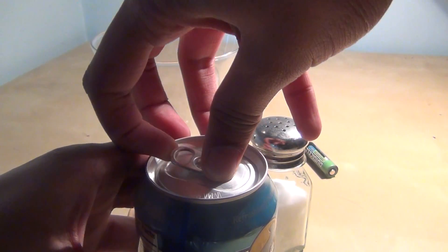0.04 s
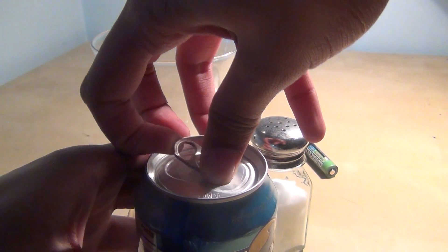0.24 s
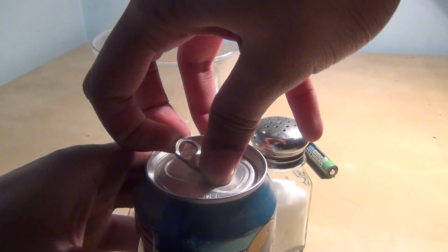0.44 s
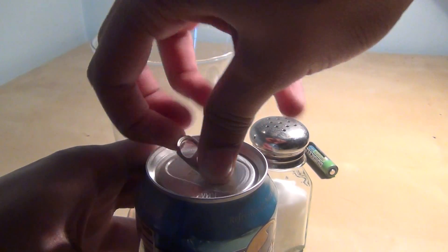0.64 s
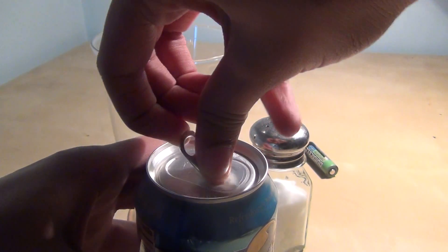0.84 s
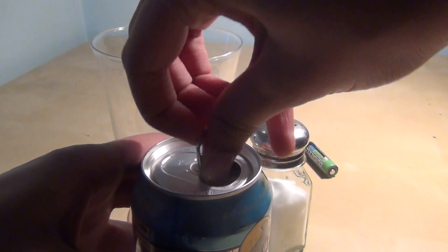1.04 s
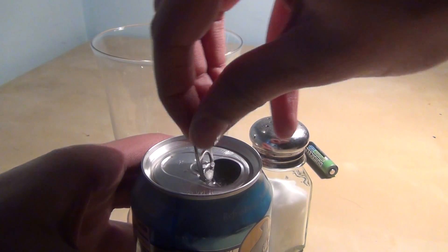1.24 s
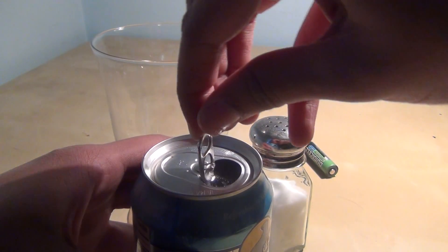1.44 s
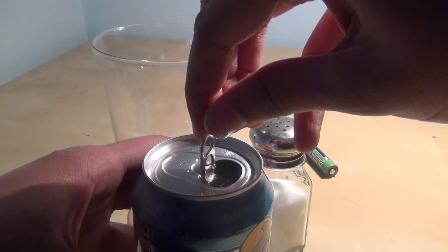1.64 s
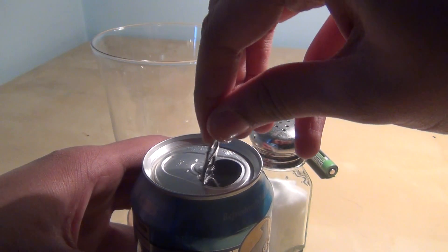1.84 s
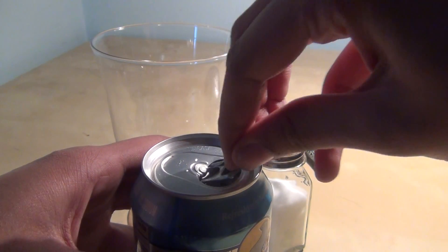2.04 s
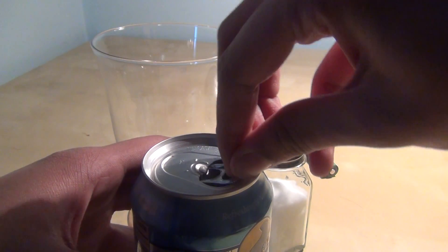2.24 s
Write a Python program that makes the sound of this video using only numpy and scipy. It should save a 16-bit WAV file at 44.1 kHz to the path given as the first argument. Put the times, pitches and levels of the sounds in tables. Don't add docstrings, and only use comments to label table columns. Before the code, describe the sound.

A drink can is cracked open close by with a sharp hiss, a pop, then faint fizz.

```python
import sys
import numpy as np
from scipy import signal
from scipy.fft import rfft, irfft, next_fast_len
from scipy.io import wavfile
from scipy.ndimage import uniform_filter1d, map_coordinates

SR = 44100
rng = np.random.default_rng(int(sys.argv[2]) if len(sys.argv) > 2 else 0)


def to_linear_factor(level_db):
    exponent = np.asarray(level_db, float) / 20
    return 10 ** exponent


def pcm_store(signal):
    levels = np.round(np.clip(np.atleast_2d(signal), -1, 1) * 32767)
    wavfile.write(sys.argv[1], SR, levels.astype(np.int16).T)


N = 101429


def unit(x):
    return x / np.sqrt(np.mean(x ** 2) + 1e-20)


def noise():
    return rng.standard_normal(N)


def along(points, hz):
    f, v = np.transpose(points)
    return np.interp(np.log(hz + 1), np.log(f + 1), v)


def level(rows, outside=-120):
    s, db = np.transpose(rows)
    return to_linear_factor(np.interp(np.arange(N) / SR, s, db, left=outside))


def wobble(rate):
    knots = rng.standard_normal(int(N * rate / SR) + 4)
    return map_coordinates(knots, [np.arange(N) * rate / SR])


def filtered(x, response):
    m = next_fast_len(len(x.T) + 8192)
    return irfft(rfft(x, m) * response(np.fft.rfftfreq(m, 1 / SR)), m)[..., :len(x.T)]


def peak(f, hz, width):
    return 1j * f * width / (hz * hz - f * f + 1j * f * width)


def hollow(x, colour, cavity):
    def response(f):
        resonances = sum((to_linear_factor(db) - 1) * peak(f, hz, w) for hz, w, db in cavity)
        return to_linear_factor(along(colour, f)) * (1 + resonances)
    return unit(filtered(x, response))


def patchy(x):
    z = signal.stft(x, nperseg=256)[2]
    field = uniform_filter1d(rng.standard_normal(z.shape), size=4, axis=0)
    field = uniform_filter1d(field, size=6, axis=1)
    patch_db = 3 * unit(field)
    return unit(signal.istft(z * to_linear_factor(patch_db), nperseg=256)[1][:N])


# (time [s], peak level [dB], lid ring [Hz], bright crack [dB], T60 [s])
SNAPS = [(0.2448, -15.5, 4250, 1.5, 0.0058), (0.2854, -12, 5000, -11, 0.0069),
         (0.3084, -12.5, 4090, -20, 0.0095), (0.3084, -18, 2120, -28, 0.0065),
         (.518, -51.5, 3700, -11, 0.01), (0.703, -56, 3650, -2, 0.016), (0.786, -53, 3500, -12, 0.0066),
         (0.803, -51, 3900, -10, 0.011), (0.832, -41.5, 3800, -6, 0.016),
         (0.839, -41.5, 3700, -11.5, 0.0094), (0.8498, -33, 3700, -24, 0.011),
         (0.8538, -23, 5000, -9.5, 0.0076), (0.8569, -24, 5450, 7.5, 0.014),
         (0.8572, -25, 3530, -30, 0.019), (0.8545, -33.5, 1980, -30, 0.0066),
         (0.9736, -15.5, 3400, -0.5, 0.014), (0.9755, -24.5, 7500, -6, 0.03),
         (0.9823, -31, 3300, -24, 0.028), (0.9904, -14.5, 9000, 4, 0.0059),
         (1.0062, -13.5, 2800, -27, .012)]
# (time [s], peak level [dB], lid ring [Hz], bright crack [dB], T60 [s])
TICKS = [
    (1.113, -27, 3300, -26, .01),
    (1.759, -40.5, 7700, -15, 0.0062),
    (1.951, -42, 1970, -30, 0.0069),
    (2.014, -42, 7340, -10, 0.0055),
    (2.079, -44, 7600, -8, 0.0052),
    (2.108, -44, 6500, -12, 0.0067),
    (2.138, -44, 7400, -10, 0.0066),
    (2.1599, -29.5, 3600, 5.5, 0.0048),
    (2.0672, -44, 7900, -20, 0.011),
]
# (frequency [Hz], width [Hz], level [dB])
LID_MODES = [(1400, 360, -1), (1900, 170, 2), (3620, 497, 0.5), (4440, 790, -3), (5600, 1600, -2),
             (6500, 680, 5), (7500, 1900, 3)]


def snaps(rows):
    reach_oct, sharp, thump_db = 0.47, 1.4, -15.5
    out, t = np.zeros(N + SR), np.arange(SR // 20) / SR
    click = 1. * (t == 0)
    for s, db, hz, bright_db, t60 in rows:
        def lid(f):
            total = 0
            for k, (centre, width, mode_db) in enumerate(LID_MODES):
                near = 0.029 + np.exp(-(np.log2(centre / hz) / reach_oct) ** 2)
                total = total + (-1) ** k * to_linear_factor(mode_db) * near * peak(f, centre, width)
            return total

        def norm(v):
            return v / np.linalg.norm(v) * np.sqrt(t60 * SR / 28)

        jolt, scrape = rng.standard_normal((2, len(t))) * to_linear_factor(-60 * t / t60)
        jolt[0] = sharp * np.sqrt(t60 * SR / 14)
        scrape *= 1 - np.exp(-t / .0003)
        scrape[3] = .4 * jolt[0]
        ring = filtered(jolt, lid)
        thump = filtered(click, lambda f: peak(f, 1300, 2600))
        crack = filtered(scrape, lambda f: peak(f, 10500, 8000) ** 2)
        snap = norm(ring) + to_linear_factor(thump_db) * norm(thump) + to_linear_factor(bright_db) * norm(crack)
        out[round(s * SR):][:len(t)] += to_linear_factor(db) * snap
    return out[:N]


# (time [s], level [dB])
SEEP = [(.228, -89.5), (.231, -60.5), (.241, -54.5), (.245, -45.5), (.252, -57), (.26, -100)]
JET = [(.236, -92), (.242, -54.5), (.246, -30), (.2525, -23.5), (.2545, -22), (.3, -23.5), (.307, -26),
       (.313, -47), (.33, -95)]
RUSH = [(.9955, -90), (.9962, -17.5), (1.002, -30.5), (1.007, -23.5), (1.0125, -30), (1.017, -23.5),
        (1.03, -26.5), (1.11, -48.5), (1.3, -100)]
HOWL = [(.9955, -90), (.997, -28), (1.003, -23), (1.012, -37), (1.015, -24), (1.028, -25.5), (1.06, -33),
        (1.1, -43), (1.25, -74)]
# (frequency [Hz], density [dB per Hz])
JET_COLOUR = [(88, -46.5), (150, -23.5), (2050, -19), (2700, -16), (4170, -8.5), (6840, -7.5), (9770, -2),
              (14200, -2.5), (17000, -13)]
RUSH_COLOUR = [(60, -11), (180, 2.5), (300, -21.5), (1860, -15.5), (3250, -6), (6600, -15.5), (12100, -18),
               (17000, -26.5)]
# (frequency [Hz], width [Hz], level [dB])
RUSH_CAVITY = [(1264, 310, 13.8), (2800, 220, 2.1), (3300, 470, 1.5), (8660, 2000, 7)]
HOWL_MODES = [(2790, 193, -2), (3093, 260, 2.5), (3400, 300, 1), (3690, 430, -1.5), (5000, 1380, -12)]


def gas():
    seep = unit(filtered(noise(), lambda f: peak(f, 4500, 2200) ** 2))
    jet = hollow(noise() * to_linear_factor(3.3 * wobble(1500)), JET_COLOUR, [(8500, 3000, 4.3)])
    rush = hollow(noise() * to_linear_factor(1.5 * wobble(900)), RUSH_COLOUR, RUSH_CAVITY)
    breath = noise() * to_linear_factor(1.2 * wobble(300))
    howl = unit(filtered(breath, lambda f: sum(to_linear_factor(db) * peak(f, hz, w) ** 2 for hz, w, db in HOWL_MODES)))
    return level(SEEP) * seep + level(JET) * jet + level(RUSH) * rush + level(HOWL) * howl


# (time [s], level [dB])
FIZZ = [(1.08, -64.5), (1.22, -55.5), (1.45, -59.5), (2.3, -59.5)]
FOAM = [(1.08, 3), (1.25, 2.5), (1.45, 4), (1.7, 1), (1.8, -4.5), (2.05, -2.5), (2.3, -10)]
# (frequency [Hz], density [dB per Hz])
FIZZ_COLOUR = [(400, -14), (1000, -13.5), (2500, -13), (4600, -11), (8000, -6.5), (12000, -8.5),
               (13500, -16), (17000, -18.5)]
# (frequency [Hz], width [Hz], level over the rest [dB])
CAVITY = [(1480, 540, 10), (3600, 1200, 7.5), (5030, 310, 5), (6250, 460, 6.5), (7760, 1600, 5),
          (9400, 1200, -0.5)]
# (frequency [Hz], width [Hz], level [dB])
PING_MODES = [(1450, 490, -4), (3470, 770, -6), (7710, 840, 1), (9800, 4300, 0)]


def fizz():
    pops = (rng.random(N) < 3000 / SR) * noise()
    pops = pops * to_linear_factor(np.minimum(3.5 * rng.exponential(size=N), 10))
    pings = 0
    for k, (hz, width, db) in enumerate(PING_MODES):
        shifted = np.roll(pops, 3001 * k)
        pings = pings + to_linear_factor(db) * unit(filtered(shifted, lambda f: peak(f, hz, width) ** 2))
    seethe = level(FOAM) * hollow(noise() * to_linear_factor(2.34 * wobble(400)), FIZZ_COLOUR, CAVITY)
    return level(FIZZ) * to_linear_factor(-1.5 + 3.0 * wobble(6.0)) * (patchy(pings) + seethe)


# (time [s], length [s], level [dB])
RUBS = [
    (0.549, 0.024, -71),
    (0.693, 0.06, -69.5),
    (1.522, 0.076, -61.5),
    (1.664, 0.24, -66.5),
    (1.97, 0.04, -60.5),
    (2.233, 0.044, -80),
]


def rubs():
    t = np.arange(N) / SR
    stroke = sum(to_linear_factor(db) * np.exp(-((t - s) / (length / 2)) ** 2) for s, length, db in RUBS)
    rough = noise() * to_linear_factor(3.5 * wobble(250))
    return stroke * unit(filtered(rough, lambda f: peak(f, 3700, 900) ** 2 + .2 * peak(f, 9000, 9000)))


# (time [s], peak level [dB], pitch [Hz], T60 [s])
CLINKS = [(.565, -66, 3830, .02), (.956, -41.5, 3400, 0.028), (0.9672, -26, 3400, 0.039),
          (0.967, -35.5, 1450, 0.034), (1.1122, -20, 1300, .014), (1.116, -36, 1230, 0.06),
          (1.004, -21, 1175, 0.028), (1.1125, -26.5, 1970, 0.0083), (1.166, -45, 7060, 0.023),
          (1.951, -41, 3400, 0.024), (1.951, -47, 1450, .03), (1.9748, -45, 3350, 0.026),
          (2.036, -51, 3300, 0.019), (2.044, -56, 1600, 0.055), (2.068, -44.5, 3210, 0.018),
          (2.070, -55, 1450, .015), (2.140, -44, 1366, 0.034), (2.140, -48, 3220, .02),
          (2.161, -45, 1450, 0.033), (2.206, -56, 3340, 0.036)]


def clinks():
    rise_s, spacing = 0.00092, 0.115
    out, t = np.zeros(N + SR), np.arange(SR // 10) / SR
    for s, db, hz, t60 in CLINKS:
        spread, phase = rng.random(2)
        twin_hz = hz * (1 + spacing * (.5 + spread))
        pair = np.sin(2 * np.pi * hz * t) + 0.57 * np.sin(2 * np.pi * (twin_hz * t + phase))
        out[round(s * SR):][:len(t)] += to_linear_factor(db - 60 * t / t60) * (1 - np.exp(-t / rise_s)) * pair
    return out[:N] * to_linear_factor(2.5 * wobble(900))


# (time [s], ring level [dB], thud level [dB], thud period [s])
PUSHES = [
    (0.263, -70, -26, 0.038),
    (.31, -41, -64, 0.011),
    (.857, -53.5, -68, 0.014),
    (.970, -52, -41, 0.015),
    (.996, -27.5, -18, 0.0127),
    (1.113, -56, -41.5, 0.0059),
    (2.03, -74, -47, 0.0045),
    (2.045, -59, -40.5, 0.0072),
    (2.168, -53, -38, 0.0071),
]
# (frequency [Hz], level [dB], T60 [s])
TABLE_MODES = [(140.4, -2, 0.33), (190.3, -3.5, 0.29), (345, -12.5, 0.35), (536.5, -19, 0.28),
               (606, -17.5, 0.16), (667.5, -20, 0.39)]


def table():
    out, t = np.zeros(N + SR), np.arange(SR // 2) / SR
    for s, ring_db, thud_db, period in PUSHES:
        ring = 0
        for hz, db, t60 in TABLE_MODES:
            mode_db = db + rng.normal(0, 2.7)
            ring = ring + to_linear_factor(mode_db - 60 * t / t60) * np.sin(2 * np.pi * hz * t)
        ring = ring * (1 - np.exp(-t / 0.0014))
        u = t / period
        thud = np.sin(2 * np.pi * u ** .85) * np.exp(-u / 1.05)
        out[round(s * SR):][:len(t)] += to_linear_factor(ring_db) * ring + to_linear_factor(thud_db) * thud
    return out[:N]


# (frequency [Hz], T60 [s])
ROOM_T60 = [(150, 0.56), (1000, 0.18), (4000, 0.22), (8000, 0.2), (16000, 0.16)]
# (frequency [Hz], level [dB])
WALLS = [(70, -2.5), (300, 4.5), (900, 6), (1900, 1.5), (2600, 6), (3900, -3.5), (5200, 5.5), (7000, 0.5),
         (10000, -2.5), (16000, 1.5)]


def room(x):
    gap_s, rise_s, scatter_db = 0.016, 0.0024, 2
    hz, t, z = signal.stft(rng.standard_normal((2, SR // 2)), SR, nperseg=128)
    onset = to_linear_factor(scatter_db) + 1 / (1 + np.exp(-(t - gap_s) / (rise_s / 4)))
    decay = to_linear_factor(-60 * t / along(ROOM_T60, hz)[:, None])
    tail = signal.istft(z * onset * decay, SR, nperseg=128)[1]
    x = filtered(x, lambda f: to_linear_factor(along(WALLS, f)))
    return signal.fftconvolve(x[None], tail / np.linalg.norm(tail[0]), axes=1)[:, :N]


# (frequency [Hz], density [dB per Hz])
HISS_COLOUR = [(15, -38), (25, -2), (241, -5.5), (490, -15.5), (868, -14), (2020, -20.5), (3490, -28),
               (14400, -30), (17000, -34.5)]
# (frequency [Hz], width [Hz], rms level [dB])
HUM = [(50, 11, -73.5), (108, 25, -70.5), (180, 24, -76.5), (239, 42, -66.5), (882, 39, -78)]
# (time [s], gain [dB])
GAIN = [(0, 3), (.24, 3.5), (.33, 2.5), (.5, -3), (.85, -2), (1.0, 6), (1.2, -3.5), (2.3, 3)]
# (time [s], rms level [dB])
DRONE = [(0, -87), (.15, -68.5), (.45, -75.5), (.56, -68.5), (.9, -59.5), (1.25, -84), (1.31, -64),
         (1.38, -72), (1.44, -62), (1.63, -61), (1.75, -76), (1.83, -60.5), (1.93, -61), (2.0, -88),
         (2.12, -59), (2.3, -56)]


def floor():
    hiss = np.array([hollow(noise(), HISS_COLOUR, []) for _ in range(2)])
    hiss = hiss * to_linear_factor(-64.5 + 0.72 * wobble(5.9))
    hum = 0
    for hz, width, db in HUM:
        band = unit(filtered(rng.standard_normal((2, N)), lambda f: peak(f, hz, width) ** 2))
        hum = hum + to_linear_factor(db + 1 * wobble(8.6)) * band
    drone_hz = 133.4 + 2.8 * wobble(18.0)
    drone = np.sqrt(2) * np.sin(2 * np.pi * np.cumsum(drone_hz) / SR) * to_linear_factor(2.5 * wobble(37))
    return level(GAIN) * (hiss + hum) + level(DRONE) * drone * [[1], [.1]]


# (frequency [Hz], side over mid [dB])
SIDE_LEVEL = [(60, -13), (150, -22.5), (380, -18), (950, -15), (2380, -26), (6000, -17.5), (11000, -15.5),
              (12500, -30)]


def scene():
    metal, ticks, flow, chinks, wood = snaps(SNAPS), snaps(TICKS), gas(), clinks(), table()
    bubbles = fizz() + rubs()
    can = metal + flow + bubbles + chinks + ticks
    to_room = to_linear_factor(7) * metal + flow + to_linear_factor(-5.5) * bubbles + to_linear_factor(-1) * chinks + to_linear_factor(-2) * ticks
    mid, side = to_linear_factor(-16) * room(to_room) + floor()
    side = to_linear_factor(3.5) * side + to_linear_factor(-3.5) * np.roll(can, 9) + to_linear_factor(-5.5) * np.roll(wood, 110)
    side = filtered(side, lambda f: to_linear_factor(along(SIDE_LEVEL, f)))
    mid = mid + can + wood
    return np.array([mid + side, mid - side])


def band_limit(x):
    return signal.sosfilt(signal.butter(12, 17870, fs=SR, output="sos"), x)


def record(dry):
    low_cut_hz, top_hz = 41.3, 16700
    mix = filtered(dry, lambda f: (1j * f / (low_cut_hz + 1j * f)) ** 3 / (1 + (f / top_hz) ** 60))
    return band_limit(mix)


dry = scene()
out = record(dry)
pcm_store(out)
```